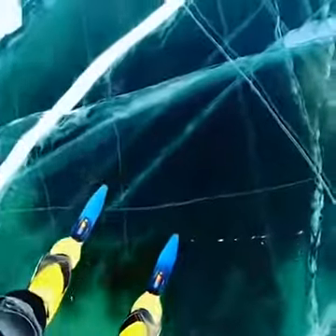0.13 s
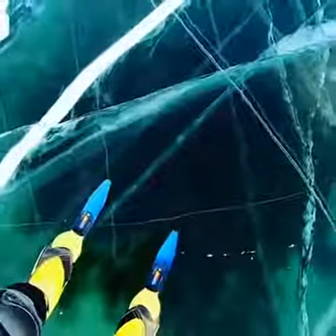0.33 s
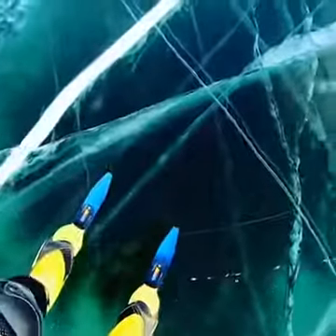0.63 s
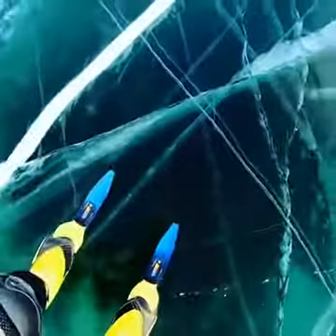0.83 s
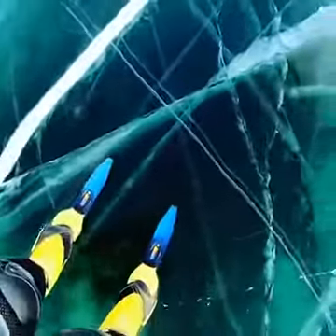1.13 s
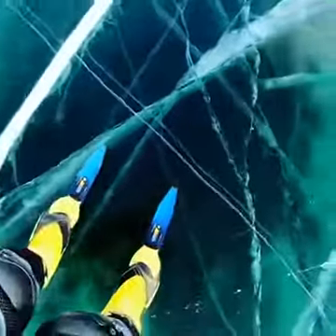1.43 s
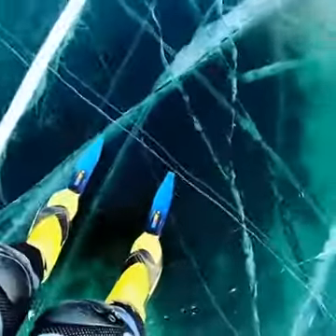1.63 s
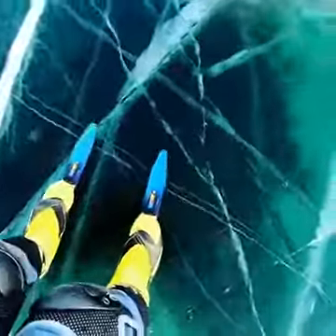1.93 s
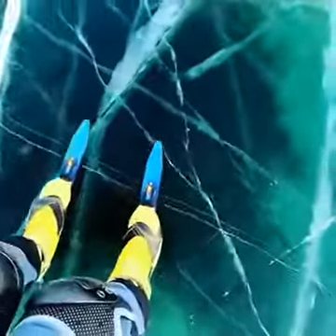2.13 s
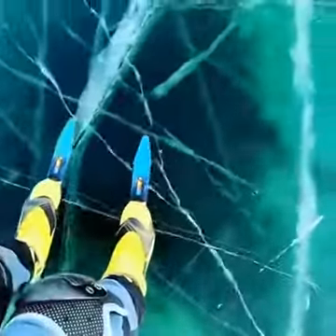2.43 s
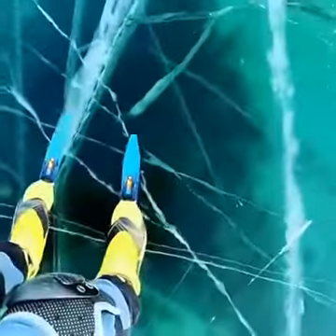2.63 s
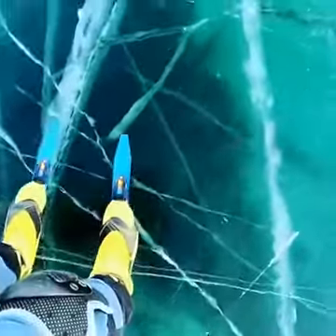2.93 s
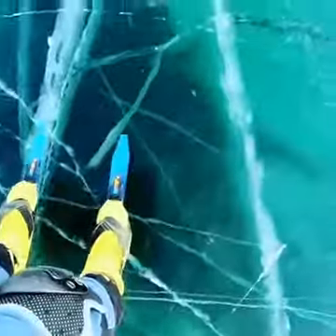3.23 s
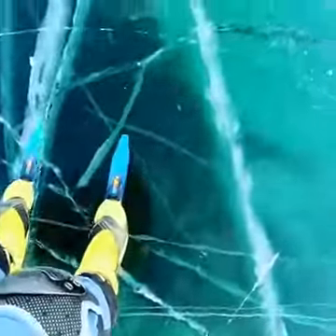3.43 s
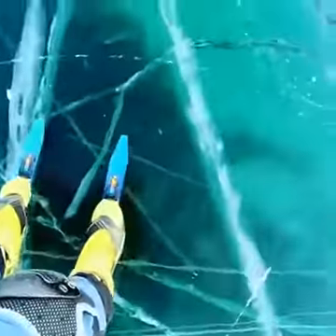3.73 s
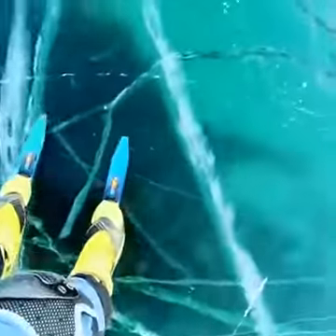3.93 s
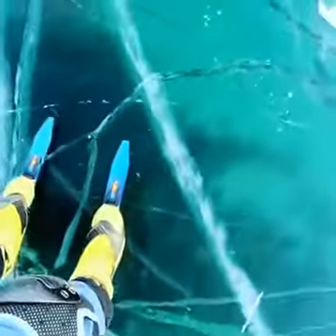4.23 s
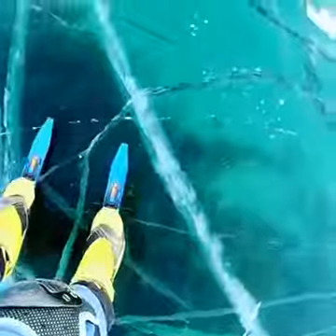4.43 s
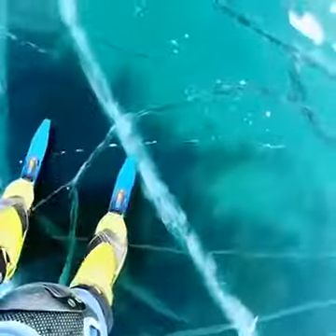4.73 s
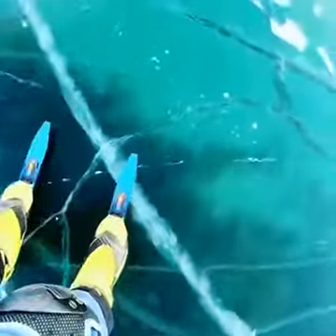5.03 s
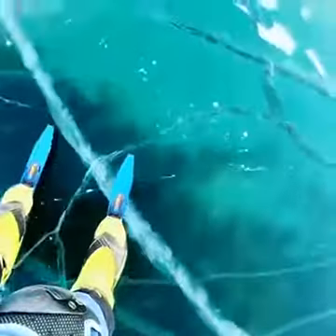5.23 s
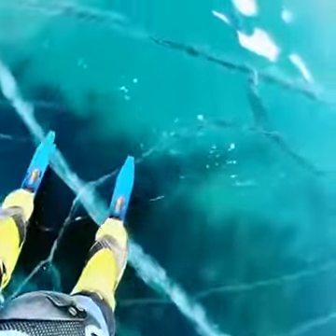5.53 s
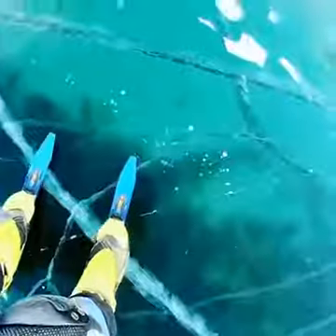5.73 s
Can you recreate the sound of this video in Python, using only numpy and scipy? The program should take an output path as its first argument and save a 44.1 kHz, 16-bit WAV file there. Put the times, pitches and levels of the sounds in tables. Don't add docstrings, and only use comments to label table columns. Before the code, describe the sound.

A skater glides quietly on thin-sounding lake ice that snaps loudly around one and three seconds, ringing low with swooping tones, then cracks again near the end.

```python
import sys
import numpy as np
from scipy import signal
from scipy.fft import rfft, irfft, next_fast_len
from scipy.io import wavfile
from scipy.ndimage import uniform_filter1d

SR = 44100
rng = np.random.default_rng(int(sys.argv[2]) if len(sys.argv) > 2 else 0)


def master(y):
    cut = np.clip(np.atleast_2d(y).T, -1, 1)
    pcm = np.round(cut * 32767)
    wavfile.write(sys.argv[1], SR, pcm.astype(np.int16))


def gain_from_db(level_db):
    decades = np.asarray(level_db, float) / 20
    return 10 ** decades


N = 258867
STEP = 16
GRID = np.arange(N // STEP + 1) * STEP / SR
EDGES = 18 * 2 ** np.arange(0, 10.1, .4)
CENTRES = np.sqrt(EDGES[1:] * EDGES[:-1])


def at_hz(points, hz):
    return np.interp(np.log(hz), np.log(np.array(points)[:, 0]), np.array(points)[:, 1])


def unit_power(db_per_hz):
    power = gain_from_db(db_per_hz) ** 2
    return power / np.sum(power * np.diff(EDGES) / (SR / 2))


def drift(rate, count):
    r = np.exp(-2 * np.pi * rate * STEP / SR)
    settle = 4000
    white = rng.standard_normal((count, N // STEP + 1 + settle))
    slow = signal.lfilter([1], [1, -2 * r, r * r], white)[:, settle:]
    return slow / slow.std(axis=1, keepdims=True)


def swell(s, db, rise_s, hold_s, fall_s):
    corners_s = s + np.cumsum([0, rise_s, hold_s, fall_s])
    return np.interp(GRID, corners_s, db - np.array([20, -1.5, 1.5, 18]))


def add_burst(power, at_s, colour, peak_s, head_s, head_db, t60, pan_db):
    first = max(int((at_s - .3) * SR / STEP), 0)
    last = int((at_s + 1.2) * SR / STEP)
    since = np.arange(power.shape[-1])[first:last] * STEP / SR - at_s - peak_s[:, None]
    climb = np.where(since > -head_s[:, None], head_db * since / head_s[:, None], -200)
    shape = gain_from_db(np.where(since < 0, climb, -60 * since / t60[:, None])) ** 2
    power[:, :, first:last] += (colour[:, None] * shape)[:, None] * gain_from_db([[pan_db], [-pan_db]])


def pair(white, likeness):
    alike = np.clip(likeness, 0, 1)
    shared = np.sqrt(1 + alike) * white[0]
    apart = np.sqrt(1 - alike) * white[1] * [[1], [-1]]
    return (shared + apart) / np.sqrt(2)


def band_noise(likeness, *layers):
    white = rng.standard_normal((2, 2, N))
    out = np.zeros((2, N))
    for k, (low, high, hz) in enumerate(zip(EDGES, EDGES[1:], CENTRES)):
        level = sum(np.repeat(levels[k], STEP, axis=-1)[..., :N] * texture for levels, texture in layers)
        drive = level * pair(white[k % 2], at_hz(likeness, hz))
        out += signal.sosfilt(signal.butter(2, [low, high], "band", fs=SR, output="sos"), drive)
    return out


# pitch in Hz, level in dB per Hz.
WIND_COLOUR = [(11, -29), (18, 3), (78, -11.5), (134, -10), (152, -25.5), (170, -14), (220, -38),
               (370, -120)]
# time in seconds, level in dB.
GUSTS = [
    (0, -42),
    (.3, -48),
    (1.0, -51),
    (1.44, -53.5),
    (1.85, -47),
    (2.5, -49),
    (3.9, -54),
    (4.8, -54),
    (5.33, -53.5),
    (5.87, -54),
]


def wind():
    heave_db = swell(2.95, -40.5, rise_s=.3, hold_s=.37, fall_s=.22)
    return WIND_COLOUR, np.maximum(np.interp(GRID, *np.transpose(GUSTS)), heave_db)


# time in seconds, level in dB.
GLIDE = [(0, -59.5), (.28, -65), (.78, -60.5), (1.0, -65.5), (1.44, -64.5), (1.85, -63), (2.03, -60),
         (2.22, -62), (2.5, -63.5), (3.48, -61.5), (3.64, -66), (3.97, -68), (4.27, -66.5), (4.81, -67.5),
         (5.05, -67.5), (5.44, -63), (5.87, -65)]


def glide_db():
    return np.interp(GRID, *np.transpose(GLIDE))


def glide_swing_db():
    return glide_db() - -64


# pitch in Hz, level in dB per Hz.
HUM_COLOUR = [(88, -22), (150, -4), (253, -3), (368, -3), (487, -7.5), (1010, -26), (1820, -41),
              (3080, -120)]


def hum():
    return HUM_COLOUR, -56 + 0.88 * glide_swing_db()


# pitch in Hz, level in dB per Hz.
SCRAPE_COLOUR = [(710, -47.5), (1200, -6), (1460, -5.5), (2500, -1), (6000, -5), (7800, -36.5),
                 (13200, -120)]


def scrape():
    skid_db = swell(5.29, -60, rise_s=.08, hold_s=.36, fall_s=.25)
    return SCRAPE_COLOUR, np.maximum(-67 + 0.89 * glide_swing_db(), skid_db)


# pitch in Hz, level in dB per Hz.
HISS_COLOUR = [(2350, -42), (4000, -25.5), (4990, -10.5), (5890, 1), (9190, -3), (10500, -0.5), (12500, -2),
               (15600, -8.5)]


def hiss():
    return HISS_COLOUR, glide_db()


# pitch in Hz, left-right likeness from 0 to 1.
GROUND_ALIKE = [(60, 0.89), (180, 0.51), (550, 0.38), (1650, 0.9), (4970, 0.97), (15000, 1)]


def ground():
    layers = [wind(), hum(), scrape(), hiss()]
    power = sum(unit_power(at_hz(colour, CENTRES))[:, None] * gain_from_db(db) ** 2 for colour, db in layers)
    flicker_db = 0.57 * drift(11.5, count=1) + 0.97 * drift(36, count=len(CENTRES))
    return band_noise(GROUND_ALIKE, (np.sqrt(power * gain_from_db(flicker_db) ** 2), 1))


def tone(row, db, waver_db, lead_rad):
    s, first_hz, lowest_hz, spread_s, hold_s = row
    sides = np.array([[1], [-1]])
    since = np.maximum(np.arange(N) / SR - s, 0)
    hz = lowest_hz + (first_hz - lowest_hz) * (1 + since / spread_s) ** -3
    rise_db = 9 * np.maximum(1 - since / spread_s / .13, 0)
    fall_db = 2.5 * np.maximum(since - hold_s, 0) * lowest_hz
    fade = np.clip(since / .008, 0, 1)
    shared, own = np.repeat(drift(25, count=2), STEP, axis=1)[:, :N]
    waver = gain_from_db(waver_db * (shared + 0.43 * own * sides))
    pitch_waver = 1 + .008 * waver_db * own
    angle = 2 * np.pi * np.cumsum(hz * pitch_waver) / SR + lead_rad * sides
    return np.sqrt(2) * gain_from_db(db - rise_db - fall_db) * fade * waver * np.sin(angle)


# start in seconds, first pitch in Hz, lowest pitch in Hz,
# spread in seconds, hold in seconds.
FAR_TONE = (1.511, 1867, 383, .134, .088)
DEEP_TONE = (2.59, 450, 16, .229, .5)
LATE_TONE = (3.155, 490, 118, .148, .075)


def falling_tones():
    clean_db, rough_db = 1.0, 2.4
    far = tone(FAR_TONE, -63.5, clean_db, lead_rad=0.091)
    late = tone(LATE_TONE, -37.5, rough_db, lead_rad=.15)
    deep = tone(DEEP_TONE, -34, rough_db, lead_rad=0.24) * gain_from_db([[1.2], [-1.4]])
    return far + late + deep


# time of peak in seconds, level in dB, t60 in seconds,
# strongest pitch in Hz.
BENDING = [(.3, -54, 2.52, 780), (.88, -58.5, 1, 705), (1.219, -23.5, 0.088, 1500), (1.238, -32, 0.34, 873),
           (1.25, -61, 0.3, 303), (1.903, -50.5, 0.57, 240), (2.002, -49, 1.3, 430),
           (2.462, -36.5, 0.83, 540), (2.51, -34.5, 0.43, 256), (2.583, -28.5, 0.7, 560),
           (2.68, -32.5, 1.1, 290), (2.80, -35, 0.56, 670), (3.125, -32.5, 0.77, 542), (3.24, -41, 1, 304),
           (3.554, -57, 0.056, 1520), (3.999, -56, 0.67, 676), (4.352, -52.5, 0.16, 1190),
           (4.519, -43, 0.39, 1010), (4.525, -49.5, 0.51, 360), (5.269, -38, 0.42, 880),
           (5.284, -43.5, 0.64, 407)]


def swelling_waves():
    return [(s, db, 0.0035 + 0.088 * t60, t60, hz, 7.5 - 5 * t60) for s, db, t60, hz in BENDING]


# start in seconds, level in dB, t60 in seconds,
# strongest pitch in Hz.
FRONTS = [
    (1.209, -40, .06, 1500),
    (2.389, -46, .4, 380),
    (2.776, -23.5, .05, 1500),
    (2.782, -20.5, .13, 1550),
    (3.054, -46, .4, 500),
    (4.482, -46.5, .3, 800),
    (5.238, -47, .3, 800),
]


def wave_fronts():
    return [(s, db, .003, t60, hz, 7) for s, db, t60, hz in FRONTS]


def bending():
    power = np.zeros((len(CENTRES), 2, len(GRID)))
    for s, db, head_s, t60, hz, fall_db in swelling_waves() + wave_fronts():
        octaves = np.log2(CENTRES / hz)
        above_db = -(14 + 0.14 * fall_db) * octaves
        colour = unit_power(np.where(octaves > 0, above_db, fall_db * octaves))
        late_s = 0.77 * t60 * 0.052 * np.maximum(2 ** (-octaves / 2) - 1, 0)
        band_head_s = late_s + head_s * 2 ** (-.4 * np.maximum(octaves, 0))
        head_db = 7 + 7 * np.log2(hz / 400)
        dying = t60 * 2 ** (-.4 * octaves)
        add_burst(power, s, colour * gain_from_db(db) ** 2, late_s, band_head_s, head_db, dying, -2.5)
    return power


# start in seconds, peak level in dB.
CRUMBLES = [(1.616, -55.5), (1.72, -55), (2.66, -41), (2.7509, -34.5), (3.094, -40), (3.378, -50),
            (3.8553, -62), (4.262, -52.5), (4.9836, -54.5), (5.1701, -60.5), (5.462, -49), (5.8487, -48.5)]


def crumbles():
    return [(s, db, -7, -25.5, 0.56) for s, db in CRUMBLES]


# start in seconds, peak level in dB, high-side level in dB.
TICKS = [(0.13, -44, -5), (0.199, -44.5, -9), (0.4494, -49.5, -40), (0.5113, -45, -20), (0.778, -50, -40),
         (0.8944, -39, 0), (0.965, -47, 0), (2.1692, -44, -9), (2.1944, -48, -27), (2.771, -25, -23),
         (3.314, -45.5, -10), (3.734, -48.5, -18), (4.1954, -52, -31), (4.3011, -53, -32),
         (4.695, -48, -27), (4.736, -47, -40), (4.847, -56, -20), (4.918, -52, 16), (5.049, -49.5, -34)]


def ticks():
    return [(s, db, -8.5, high_db, np.interp(high_db, [-15, -4], [.13, .06])) for s, db, high_db in TICKS]


# start in seconds, peak level in dB, high-side level in dB.
RUN_ONS = [
    (1.2522, -28.5, -6),
    (1.92, -46.5, 5),
    (2.6094, -29.5, -17),
    (2.8135, -35, -13),
    (3.1794, -37, -18.5),
    (3.6406, -47, -22),
    (4.008, -46.5, -22),
    (5.2937, -36.5, -14.5),
    (5.367, -41, -20),
]


def run_ons():
    return [(s, db, -7, high_db, 0.29) for s, db, high_db in RUN_ONS]


# start in seconds, peak level in dB, low-side level in dB,
# high-side level in dB, t60 in seconds.
CRACKS = [(0.0546, -36.5, -8, -27, 0.23), (0.6306, -34, -6, -29, 0.17), (0.8433, -33.5, -12.5, -22, 0.16),
          (1.2261, -18.5, -10, -12.5, 0.15), (1.76, -39.5, -11, -14, 0.15), (1.9701, -31.5, -11, -40, 0.21),
          (2.4626, -23.5, -12.5, -25.5, 0.2), (2.5807, -15, -6.5, -23.5, 0.19),
          (2.7898, -16, -7.5, -16, 0.19), (3.1234, -23, -6, -23.5, 0.18), (3.405, -38, -4, -23, 0.12),
          (3.5504, -36, 1.5, -19, 0.27), (3.9639, -38.5, -12, -31, 0.13), (4.3555, -33.5, -11.5, -15, 0.18),
          (4.5197, -37, -6, -24, 0.19), (5.2723, -21.5, -6, -26, 0.095)]


def all_cracks():
    rows = CRACKS + run_ons() + ticks() + crumbles()
    return [(*row, 0.8 if row[3] > -19.5 else 4) for row in rows]


def cracks():
    power = np.zeros((len(CENTRES), 2, len(GRID)))
    for s, db, low_db, high_db, t60, pan_db in all_cracks():
        colour = unit_power(at_hz([(500, low_db - 26), (1100, low_db - 1.5), (1800, low_db + 8), (4000, 0.03),
                                   (9000, high_db + 12.0), (13000, high_db + 7.5), (17000, high_db - 21)],
                                  CENTRES))
        head_s = 0.0018 + 0.006 * np.clip(np.log2(5000 / CENTRES), 0, 2)
        late_s = 0.025 * min(t60, .2) * np.clip(np.log2(CENTRES / 4000), 0, 2)
        dying = np.clip(t60, .02, .5) * (CENTRES / 4000) ** -.15
        burst, cloud = colour * gain_from_db(db - 7.5) ** 2, colour * gain_from_db(db - 29.5) ** 2
        add_burst(power, s + 0.00057, burst, late_s, head_s + 2.5 * late_s, 18, dying, pan_db)
        add_burst(power, s + 0.0084, cloud, late_s, head_s + 0.011, 9, 1.6 * dying, pan_db)
    return power


def splinter_grains():
    strength = gain_from_db(3.0 * np.minimum(rng.exponential(1, N), 3))
    grains = uniform_filter1d(strength * (rng.random(N) < 2500 / SR), size=9) + .25
    return grains / np.sqrt(np.mean(grains ** 2))


# pitch in Hz, left-right likeness from 0 to 1.
CRACK_ALIKE = [(60, 0.55), (180, 0.74), (550, 0.73), (1650, 0.77), (4970, 0.98), (15000, 0.96)]


def splitting_ice():
    return band_noise(CRACK_ALIKE, (np.sqrt(cracks()), splinter_grains()), (np.sqrt(bending()), 1))


def snaps():
    s, db, low_db, high_db, t60, pan_db = np.transpose(all_cracks())
    chance = rng.standard_normal((len(s), 2))
    size_db = db + 12.5 - .5 * np.maximum(high_db + 8, 0) + 2.5 * chance[:, 0]
    size = gain_from_db(size_db) * np.sign(chance[:, 1])
    clicks = np.zeros((2, N))
    clicks[:, ((s + .0035) * SR).astype(int)] = size * gain_from_db(np.outer([.5, -.5], pan_db))
    return signal.sosfilt(signal.butter(2, [1300, 7500], "band", fs=SR, output="sos"), clicks + 1e-18)


def scene():
    return ground() + falling_tones() + splitting_ice() + snaps()


def top_cut(x):
    return signal.sosfilt(signal.butter(12, 16330, fs=SR, output="sos"), x)


# pitch in Hz, left minus right in dB.
PORT_BALANCE = [(60, 0), (150, 1.5), (380, -0.5), (950, -1), (2380, 1), (5980, 1.5), (15000, -1)]


def record(dry):
    size = next_fast_len(N + 4096)
    hz = np.maximum(np.arange(size // 2 + 1) * SR / size, 1)
    half = gain_from_db(at_hz(PORT_BALANCE, hz) / 2)
    ports = irfft(rfft(dry, size) * np.array([half, 1 / half]), size)[:, :N]
    return top_cut(ports)


dry = scene()
out = record(dry)
master(out)
```